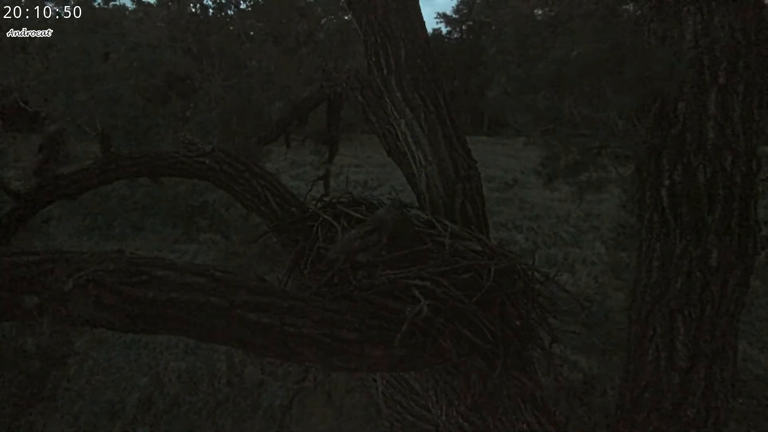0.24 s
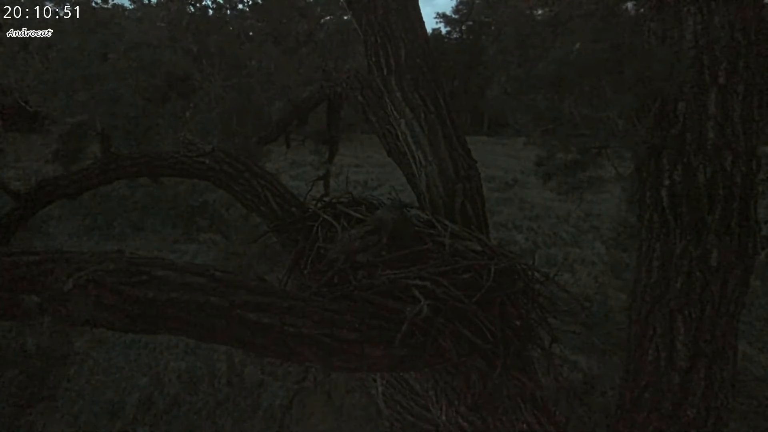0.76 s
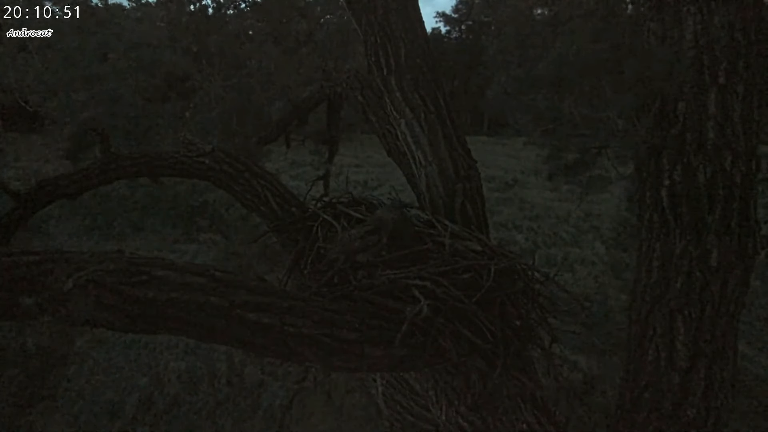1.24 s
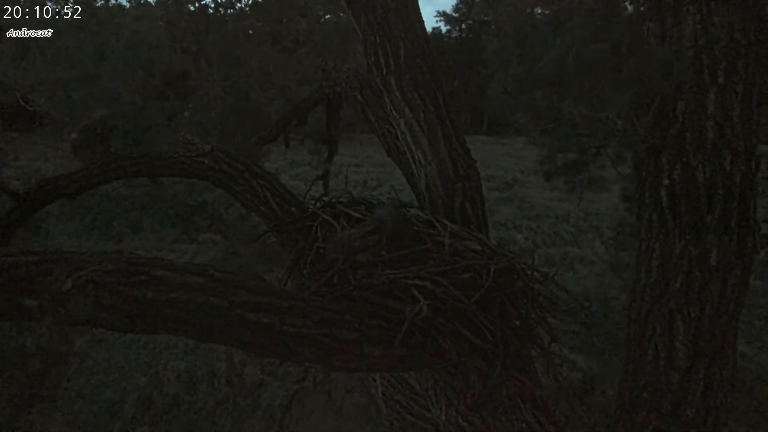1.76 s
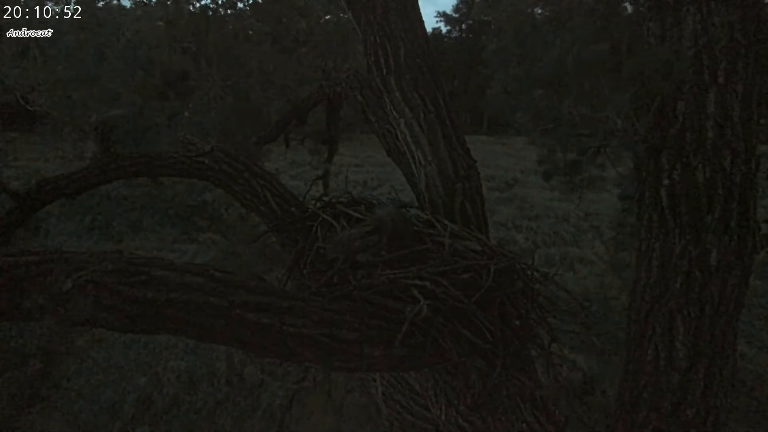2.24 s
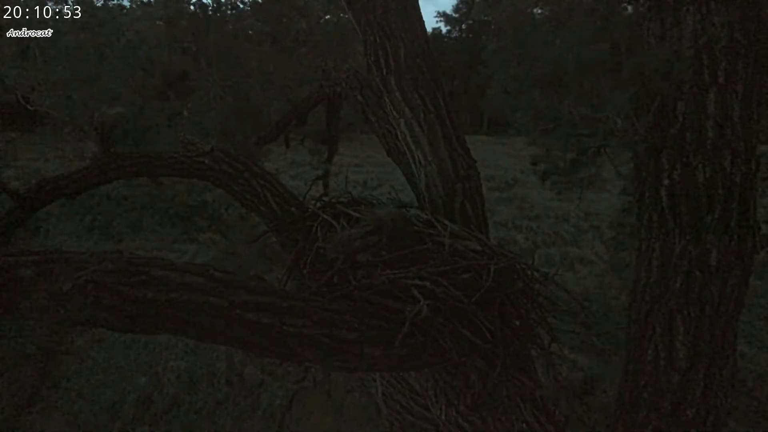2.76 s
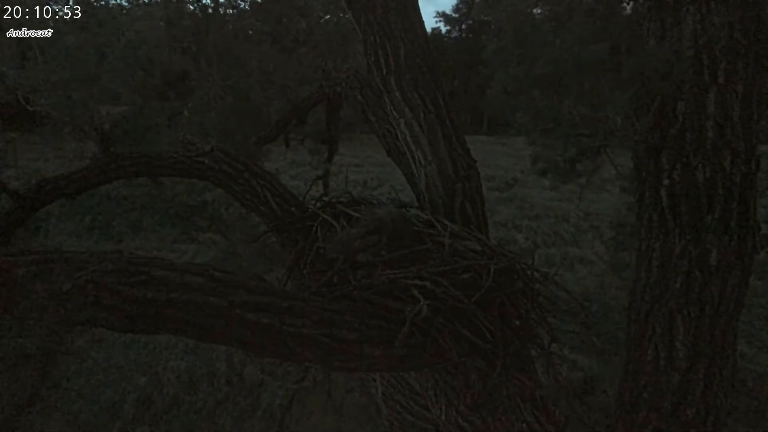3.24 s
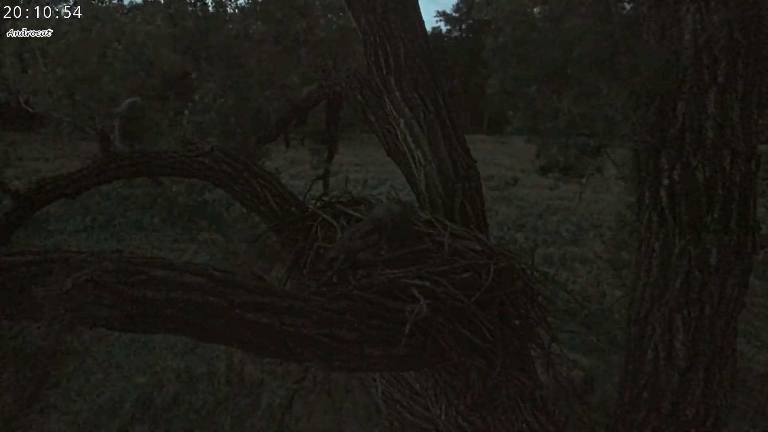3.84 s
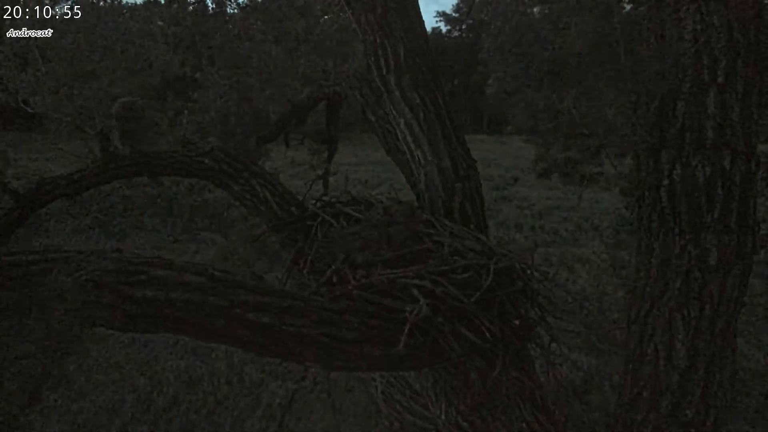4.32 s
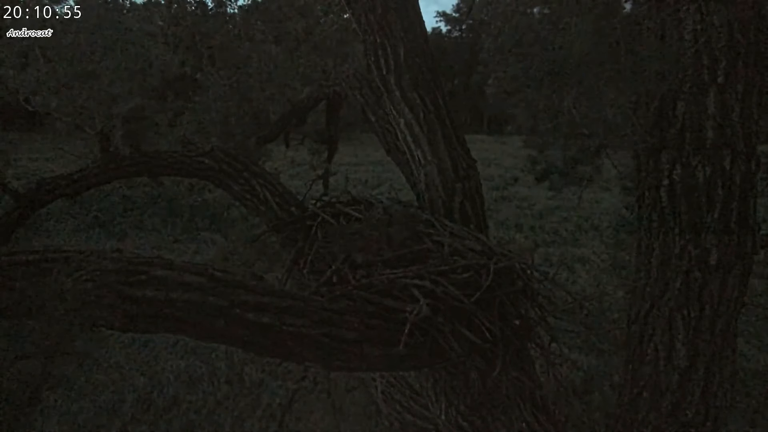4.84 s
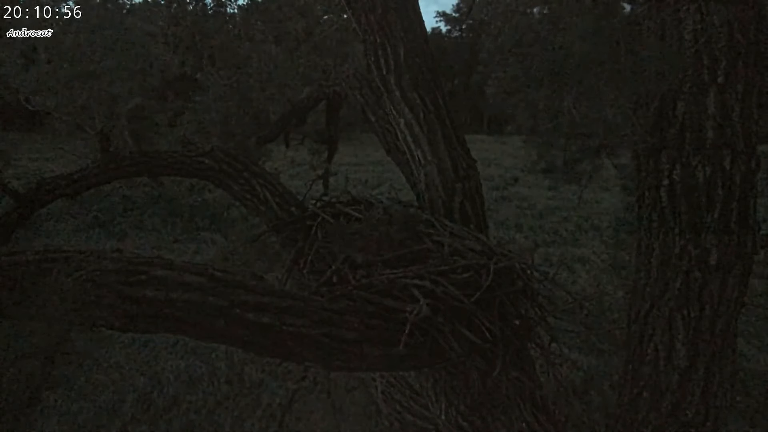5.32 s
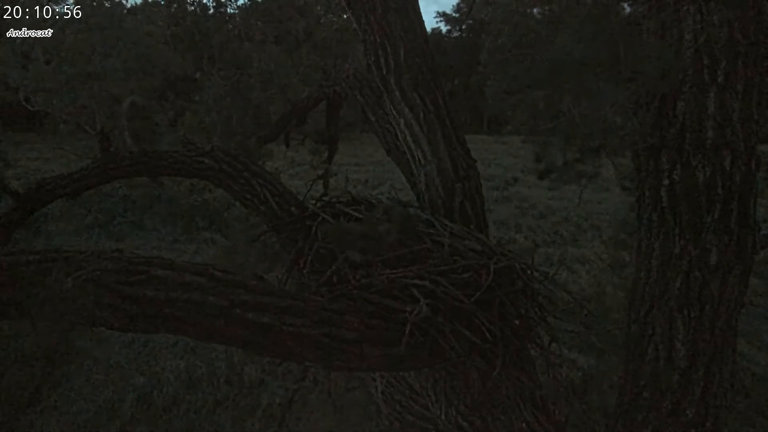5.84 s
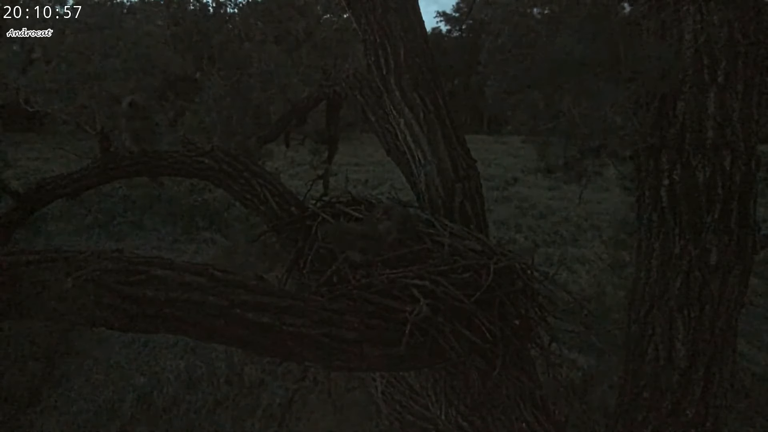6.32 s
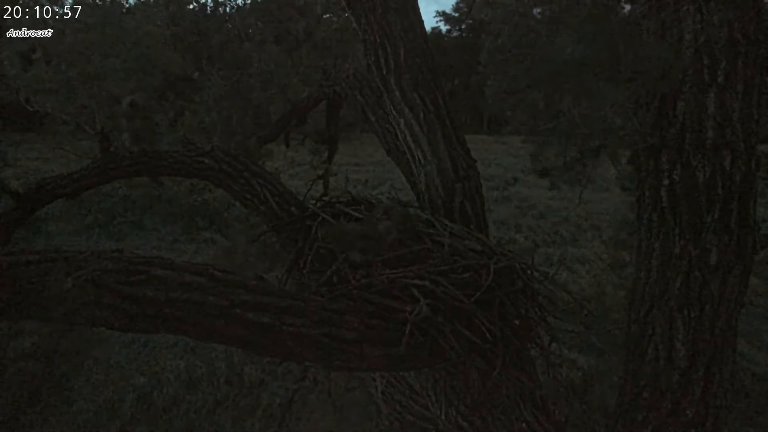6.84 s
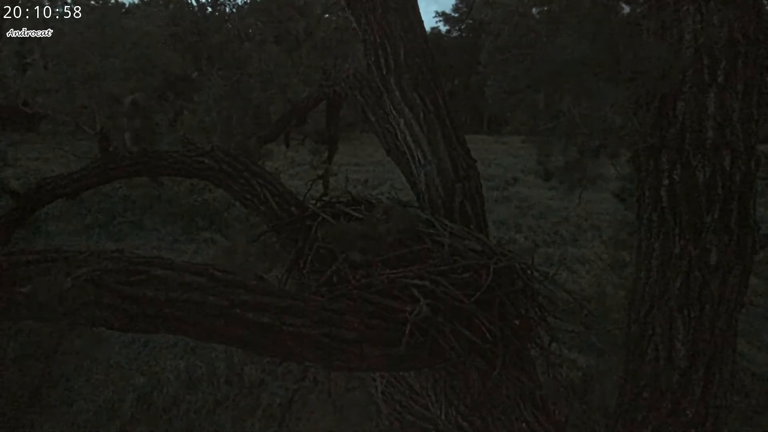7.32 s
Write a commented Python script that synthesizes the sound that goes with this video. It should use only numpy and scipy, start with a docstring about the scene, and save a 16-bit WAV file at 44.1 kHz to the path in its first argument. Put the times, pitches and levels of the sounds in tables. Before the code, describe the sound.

Owlets in a stick nest outdoors at dusk give five short, raspy screeches, each swelling into a shaky high whistle that slurs down. A steady airy hiss runs throughout. After the second and third calls, wind buffets the microphone in low thumps while the sound stutters with tiny dropouts. The fourth screech is loudest, with a small woody knock inside it; a fainter one follows near the end.

```python
"""Owlets begging at dusk

Five screeches of young owls come from a tree nest; noise through throat and beak resonances makes the rasp.
It swells and tightens into a shaky sine whistle between 3.5 and 4 kHz, which slurs down and dies.
Coloured noise makes the hiss and the air on the microphone; midway a rush of air thumps on its diaphragm
while the sound cuts out in short gaps. A knock of a few decaying sines falls inside the loudest screech."""
import sys
import numpy as np
from scipy import signal
from scipy.fft import rfft, irfft, next_fast_len
from scipy.io import wavfile
from scipy.ndimage import uniform_filter1d

SR = 44100
rng = np.random.default_rng(int(sys.argv[2]) if len(sys.argv) > 2 else 0)


def inscribe(sig):
    """Save sig as 16-bit PCM at rate SR to the path in sys.argv[1].

    A 1-D sig is mono; a 2-D sig holds one channel per row.
    Samples are clipped to [-1, 1] before scaling.
    """
    pcm = np.round(np.clip(np.atleast_2d(sig).T, -1, 1) * 32767)
    wavfile.write(sys.argv[1], SR, pcm.astype(np.int16))


N = 334278
T = np.arange(N) / SR  # time [s]


def from_db(db):
    """Decibels to gain."""
    return 10 ** (np.asarray(db) / 20)


def rms_one(x):
    """Scale to rms 1."""
    return x / np.sqrt(np.mean(x ** 2) + 1e-20)


def level_curve(rows):
    """Gain at every sample, drawn straight in decibels between the (time [s], level [dB]) points."""
    s, db = np.transpose(rows)
    return from_db(np.interp(T, s, db))


def colour(x, spectrum):
    """Filter by a (frequency [Hz], gain [dB]) curve, drawn straight over log frequency."""
    size = next_fast_len(N + 4096)
    hz, db = np.transpose(spectrum)
    bins = np.maximum(np.arange(size // 2 + 1) * SR / size, 1)
    gain = from_db(np.interp(np.log(bins), np.log(hz), db))
    return irfft(rfft(x, size) * gain, size)[:N]


def high_pass(x, order, edge_hz):
    """Butterworth filter that keeps what lies above the edge."""
    return signal.sosfilt(signal.butter(order, edge_hz, "high", fs=SR, output="sos"), x)


def drift(rate_hz, size=N):
    """Smooth random wander of rms 1: noise with only its movement below rate_hz left."""
    slow = signal.butter(2, rate_hz, fs=SR, output="sos")
    return rms_one(signal.sosfilt(slow, rng.standard_normal(size)))


def step(x):
    """A smooth step from 0 to 1 around x = 0."""
    return .5 + .5 * np.tanh(x / 2)


def hiss():
    """Even hiss of the microphone and the far foliage: coloured noise with a slow level curve."""
    # hiss level: (time [s], level [dB])
    levels = [(0, -34), (1.5, -34.7), (2.5, -34), (3.35, -31.5), (6.0, -31.5), (7.58, -30.6)]
    # hiss tone: (frequency [Hz], relative level [dB])
    spectrum = [(300, -26.5), (520, -12), (720, -17.5), (1020, -12), (1350, -17), (1700, -14), (2150, -7.5),
                (2700, -7), (3400, -10.5), (4200, -5.5), (5000, 1.5), (5900, 3.5), (6600, 2.5),
                (7100, -6.5)]
    return level_curve(levels) * rms_one(colour(rng.standard_normal(N), spectrum))


def ripple(level_db=-42):
    """A slow, steady sine lies under everything, at the very bottom of the bass."""
    return from_db(level_db) * np.sin(2 * np.pi * 12.1 * T)


def gusts(release_db_per_s=159.5):
    """Strength of the rush of air: each gust rises, holds and dies away."""
    # gusts: (start [s], end [s], level [dB, before the rush trim], attack [s])
    events = [(3.12, 3.19, -41.5, 0.025), (3.41, 3.545, -44, .01), (3.577, 3.683, -25.5, 0.0055),
              (3.751, 3.88, -29.5, 0.0051), (4.022, 4.088, -38.5, .05), (4.111, 4.262, -26, 0.036),
              (4.312, 4.46, -25, 0.026), (4.506, 4.56, -27, .01), (5.25, 5.32, -38, 0.017),
              (6.62, 6.677, -45, .02)]
    return sum(np.clip((T - start) / attack, 0, 1) * from_db(db - release_db_per_s * np.maximum(T - end, 0))
               for start, end, db, attack in events)


def air(lumpy_db=1.5, rush_db=-2.5):
    """Air on the microphone: a light rumble and a rush in gusts, both made of lumpy coloured noise."""
    # light air: (time [s], level [dB, before the lumps and filters])
    breeze_levels = [(0, -50), (.8, -48.5), (1.6, -44.5), (2.4, -50.5), (4.8, -47), (7.58, -48)]
    # tone of the light air: (frequency [Hz], relative level [dB])
    breeze_spectrum = [(50, -28), (75, -9.5), (120, -0.1), (180, 3), (250, -6.5), (330, -12.5),
                       (550, -24.5), (900, -31), (1800, -53.5)]
    # tone of the rush: (frequency [Hz], relative level [dB])
    rush_spectrum = [(50, -30), (75, -5.5), (120, 2.5), (190, 3), (260, -4), (350, -17), (550, -19.3),
                     (720, -31.5), (900, -26), (1300, -43), (2000, -46)]
    breeze = level_curve(breeze_levels) * rms_one(colour(rng.standard_normal(N), breeze_spectrum))
    rush = from_db(rush_db) * gusts() * rms_one(colour(rng.standard_normal(N), rush_spectrum))
    lumps = rms_one(from_db(lumpy_db * drift(11)))
    return (breeze + rush) * lumps


def low_cut(x, edge_hz=68):
    """The microphone's bass cut, so steep that each push of air rings on briefly."""
    return high_pass(x, 10, edge_hz)


def resonate(x, hz, width_hz):
    """A two-pole resonance with gain 1 on top."""
    r = np.exp(-np.pi * width_hz / SR)
    zeros = np.array([1, 0, -1]) * (1 - r * r) / 2
    poles = [1, -2 * r * np.cos(2 * np.pi * hz / SR), r * r]
    return signal.lfilter(zeros, poles, x)


def rasp(modes, size, low_edge_hz, grain_db, grain_rate_hz=110):
    """Turbulent air rings the resonances of throat and beak; each one flutters in strength."""
    breath = np.zeros(size)
    for hz, width_hz, db in modes:
        flutter = from_db(db + grain_db * drift(grain_rate_hz, size))
        breath += flutter * resonate(rng.standard_normal(size), hz, width_hz)
    return rms_one(high_pass(breath, 6, low_edge_hz))


def whistle(pitch_hz, jitter=.017, jitter_rate_hz=380, rough=0.34, rough_rate_hz=190, overtone_db=-21):
    """The syrinx membrane swings almost as a sine; the air stream shakes its pitch and strength."""
    size = len(pitch_hz)
    shaken_hz = pitch_hz * (1 + jitter * drift(jitter_rate_hz, size))
    phase = 2 * np.pi * np.cumsum(shaken_hz) / SR
    swing = (1 + rough * drift(rough_rate_hz, size)) * np.sin(phase)
    swing += rough * drift(rough_rate_hz, size) * np.cos(phase)
    return rms_one(swing + from_db(overtone_db) * np.sin(2 * phase))


def throat(hz, waver=0.032, waver_rate_hz=110, grain_db=2.5):
    """A thin, unsteady tone glides with the lowest throat resonance."""
    wobble = 1 + waver * drift(waver_rate_hz, len(hz))
    flutter = from_db(grain_db * drift(80, len(hz)))
    return rms_one(flutter * np.sin(2 * np.pi * np.cumsum(hz * wobble) / SR))


def screech(call, beak, tone_waver=.008, tone_flicker_db=2.0):
    """A thin, flickering tone comes and goes in the swelling rasp; a whistle locks in, slurs down and dies."""
    swell_db, swell_shape, release_db_per_s = 19, 1.74, 380
    # at the lock the rasp gives way: its lows at once, its highs gradually
    low_duck_db, high_sag_db_per_s = 4.5, 74.5
    slur_loss_db = 11.5
    # the throat pitch rises as the beak opens (share of its pitch), and its tone fades at the lock
    throat_rise, throat_fade_db = .15, 11

    (start, lock, lock_s, end, slur_s, drop, thin_hz, whistle_hz,
     thin_db, whistle_db, low_db, high_db, throat_hz, throat_db) = call
    t = start + T[:SR // 2]
    size = len(t)
    closed = np.clip((lock - t) / (lock - start), 0, 1)  # 1 at the start, 0 from the lock on
    locked = step((t - lock) / lock_s)
    slur = step((t - end) / slur_s)
    effort = from_db(-swell_db * closed ** swell_shape - release_db_per_s * np.maximum(t - end, 0))

    thin_level = np.sin(np.pi * closed) ** 2 * from_db(thin_db + tone_flicker_db * drift(35, size))
    thin = thin_level * whistle(thin_hz * (1 + tone_waver * drift(20, size)))

    pitch_hz = (thin_hz + (whistle_hz - thin_hz) * locked) * (1 - drop * slur)
    tone = locked * from_db(whistle_db - slur_loss_db * slur ** 2) * whistle(pitch_hz)

    low_level = from_db(low_db - low_duck_db * locked)
    low = low_level * rasp(beak[:2], size, low_edge_hz=1800, grain_db=2.0)
    high_level = from_db(high_db - high_sag_db_per_s * np.maximum(t - lock, 0))
    high = high_level * rasp(beak[2:], size, low_edge_hz=2860, grain_db=0.5)

    under_level = np.sqrt(1 - closed) * from_db(throat_db - throat_fade_db * locked)
    under = under_level * throat(throat_hz * (1 - throat_rise * closed ** 1.4))
    return thin + effort * (tone + low + high + under)


def screeches():
    """Every call at its time, each through its own beak shape."""
    # calls: (start [s], whistle lock [s], lock time scale [s], middle of the slur [s], slur time scale [s],
    #         pitch lost in the slur [share], thin tone [Hz], whistle [Hz], thin tone [dB], whistle [dB],
    #         low rasp [dB], high rasp [dB], throat [Hz], throat [dB]); levels before swell, fades and filters
    calls = [(.14, .392, 0.016, .486, .0045, .33, 3270, 3526, -55, -33, -36.5, -28.5, 1120, -50),
             (2.711, 2.905, 0.019, 2.967, .008, 0.015, 3686, 3705, -45.5, -32, -45.5, -32.5, 1040, -56),
             (2.961, 3.186, 0.0018, 3.263, .012, 0.46, 4020, 3565, -38, -27.5, -32, -34.5, 1060, -46.5),
             (4.939, 5.212, 0.011, 5.308, .009, .49, 3986, 4006, -35.5, -21, -30, -26.6, 1112, -45.5),
             (6.448, 6.716, 0.0053, 6.744, .010, .36, 3900, 3850, -53, -30, -37, -40.5, 1050, -63)]
    # throat and beak resonances, one row a call, two low then three high:
    # (frequency [Hz], width [Hz], relative level [dB])
    beaks = [
        [(2410, 450, -7), (3010, 490, 3), (4120, 300, -1), (4630, 600, -5.5), (5600, 390, -1)],
        [(2280, 490, -14), (2830, 210, -9.5), (4000, 420, -4), (4800, 510, -5), (5530, 460, -0.5)],
        [(2530, 230, 0), (3050, 380, 1), (4130, 350, 1.5), (4900, 450, 7), (6240, 770, -4.5)],
        [(2640, 660, -1), (3170, 450, 2), (3940, 400, -3.5), (4980, 230, 1.5), (6020, 210, -2)],
        [(2870, 180, -3), (3300, 350, -1), (3640, 350, -1), (4950, 550, -3), (5650, 560, -3.5)],
    ]
    out = np.zeros(N)
    for call, beak in zip(calls, beaks):
        start = int(call[0] * SR)
        sound = screech(call, beak)
        out[start:start + len(sound)] += sound
    return out


def trees(x, wet_db=-17, t60=0.32):
    """Trunks and foliage scatter a faint, short tail of decaying noise."""
    age = T[:SR // 2]
    tail = rng.standard_normal(len(age)) * from_db(-60 * age / t60) * (age > .008)
    return x + from_db(wet_db) * signal.fftconvolve(x, tail / np.linalg.norm(tail))[:N]


def gaps(edge_s=0.002, sink_db_per_s=90, ease_s=0.001):
    """Gain of the microphone, which drops sharply in each gap and sinks further until it snaps back."""
    # gaps: (start [s], end [s], gain halfway through, before smoothing [dB])
    cuts = [(3.128, 3.136, -16), (3.38, 3.402, -24.5), (3.442, 3.483, -31), (3.524, 3.577, -40),
            (3.623, 3.645, -28.5), (3.673, 3.751, -48), (3.77, 3.796, -39), (4.079, 4.11, -24),
            (4.151, 4.172, -30), (4.211, 4.226, -14.5), (4.325, 4.346, -16), (4.35, 4.363, -34),
            (4.404, 4.4185, -23), (4.4237, 4.438, -31), (4.457, 4.498, -32), (4.531, 4.546, -20.5),
            (5.2606, 5.266, -18), (5.399, 5.406, -13.5)]
    db = np.zeros(N)
    for start, end, depth in cuts:
        now = slice(int(start * SR), int(end * SR))
        db[now] = depth - sink_db_per_s * (T[now] - (start + end) / 2)
    gain = from_db(uniform_filter1d(db, int(edge_s * SR)))
    return np.abs(uniform_filter1d(gain, int(ease_s * SR)))


def chop(rumble, gain, split_hz=330, lag_s=.013, bass_share=0.32):
    """In a gap the upper rumble drops by half the gap's decibels; its bass sags later and by a third."""
    bass = signal.sosfiltfilt(signal.butter(4, split_hz, fs=SR, output="sos"), rumble)
    late_gain = np.interp(T - lag_s, T, gain ** bass_share)
    return bass * late_gain + (rumble - bass) * gain ** .5


def crackles(owls, gain, length_s=0.0025, trim_db=-9, floor_db=-79, spill_db=-48):
    """Short thin spits of noise over a trace of wide hiss that swells with the screeches."""
    # crackles: (time [s], level [dB, before the trim])
    events = [(3.1323, -41), (3.1677, -34), (4.1806, -48), (4.3126, -43), (4.4218, -49), (4.5436, -48),
              (5.257, -28), (5.2645, -38)]
    # each spit peaks one length after its time
    level = sum(from_db(db + trim_db) * np.exp(-((T - s) / length_s - 1) ** 2) for s, db in events)
    trace = gain * (from_db(floor_db) + from_db(spill_db) * np.abs(owls))
    return (level + trace) * high_pass(rng.standard_normal(N), 2, 3000)


def thumps(swing_hz=157, length_s=0.0061):
    """Each push of air swings the diaphragm through a few cycles."""
    # thumps: (time [s], peak level [dB, before the treble curve])
    events = [(3.606, -26), (3.634, -15), (3.892, -18), (4.205, -21), (4.364, -18), (4.567, -19)]
    return sum(from_db(db) * np.exp(-((T - s) / length_s) ** 2) * np.cos(2 * np.pi * swing_hz * (T - s))
               for s, db in events)


def knock(at_s=5.264):
    """Wood rings briefly in a few modes, each a decaying sine."""
    # modes of the wood: (frequency [Hz], level [dB, before the treble curve], 60 dB decay time [s])
    modes = [(200, -36, 0.09), (496, -42, 0.055), (680, -37, 0.037), (900, -36, .035)]
    age = np.maximum(T - at_s, 0)
    return sum(from_db(db - 60 * np.minimum(age / t60, 4)) * np.sin(2 * np.pi * hz * age)
               for hz, db, t60 in modes)


def scene():
    """One microphone feeds both channels; its gaps chop the owls and hiss in full, the rumble in part."""
    # microphone response at the top: (frequency [Hz], gain [dB])
    treble = [(6800, 1), (7200, 1), (7600, -14.5), (8000, -40), (8500, -72.5), (15000, -53.5)]
    gain = gaps()
    rumble = low_cut(chop(air(), gain)) + thumps()
    owls = trees(screeches())
    heard = colour((owls + hiss()) * gain + rumble + knock(), treble)
    mono = heard + crackles(owls, gain) + ripple()
    return np.stack([mono, mono])


def record(dry):
    """A steep elliptic filter cuts the top above 15.5 kHz."""
    return signal.sosfilt(signal.ellip(10, .1, 80, 15500, fs=SR, output="sos"), dry)


dry = scene()
out = record(dry)
inscribe(out)
```